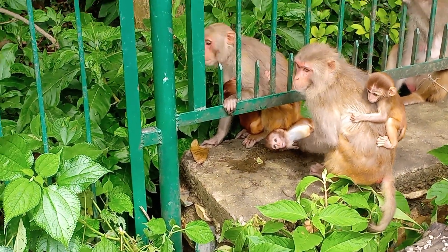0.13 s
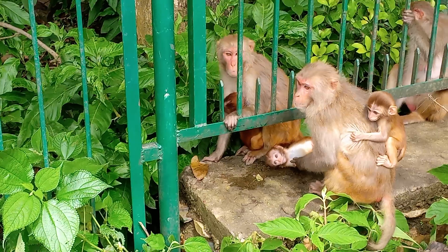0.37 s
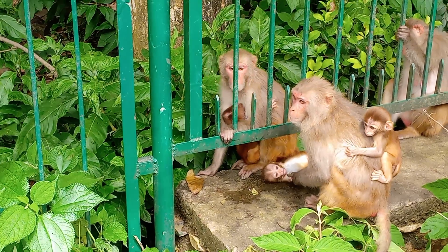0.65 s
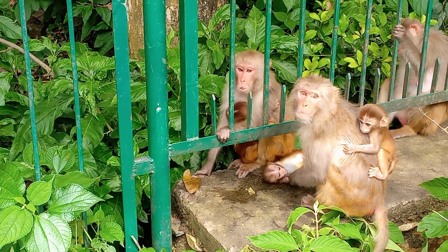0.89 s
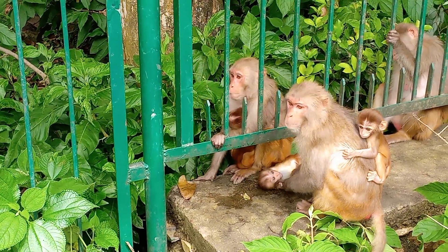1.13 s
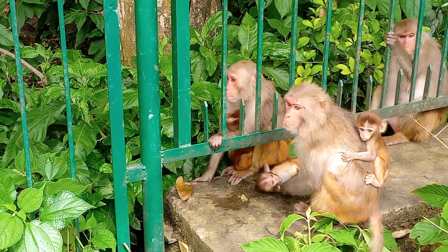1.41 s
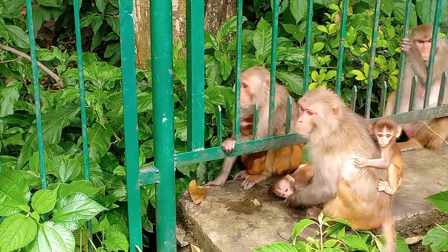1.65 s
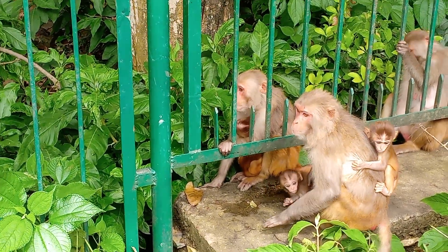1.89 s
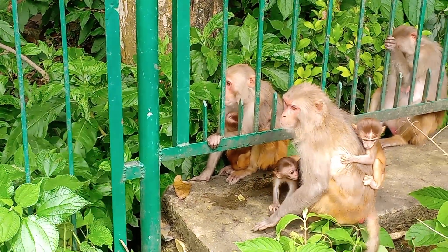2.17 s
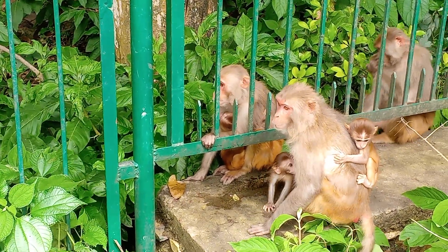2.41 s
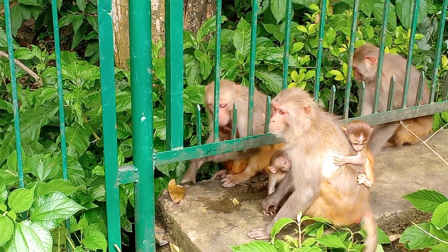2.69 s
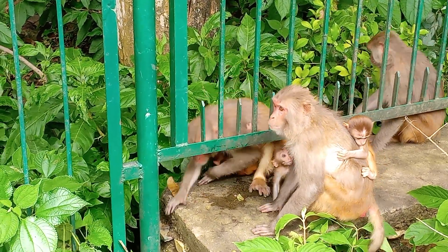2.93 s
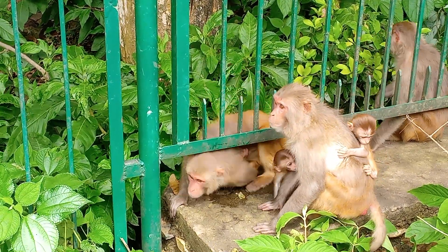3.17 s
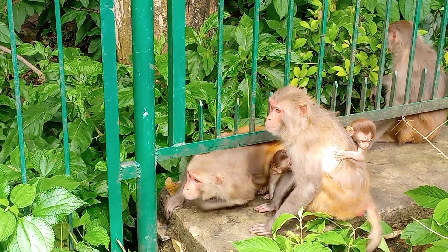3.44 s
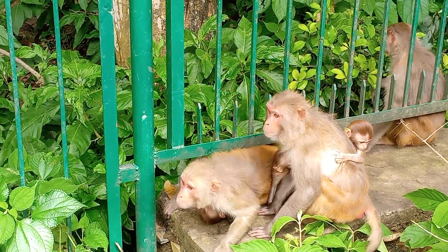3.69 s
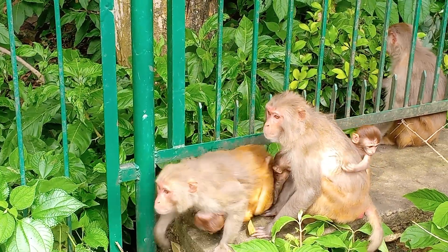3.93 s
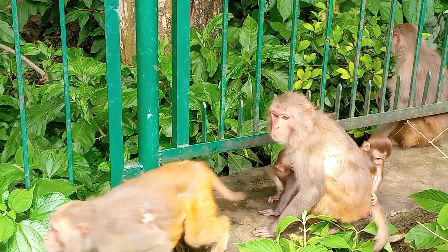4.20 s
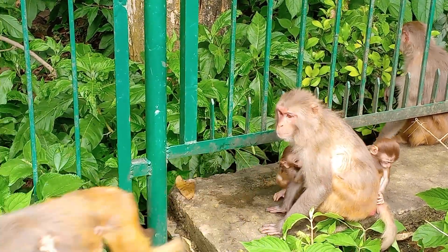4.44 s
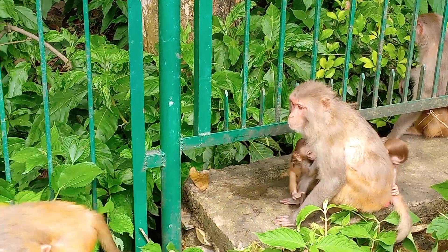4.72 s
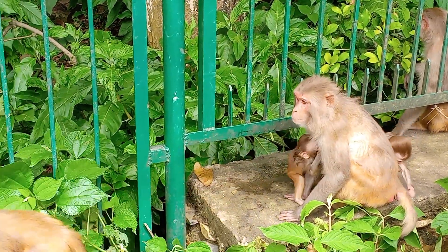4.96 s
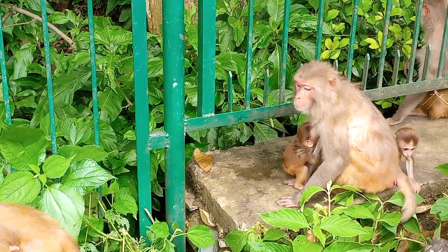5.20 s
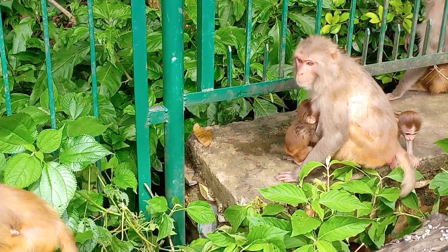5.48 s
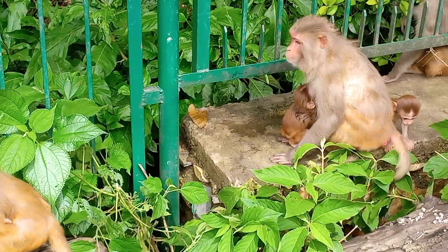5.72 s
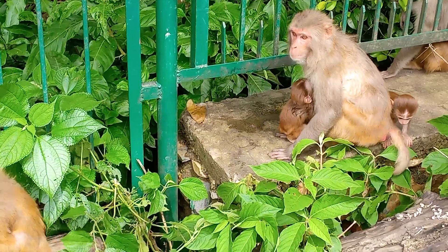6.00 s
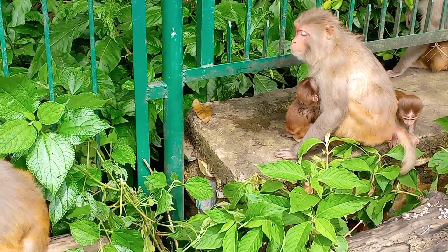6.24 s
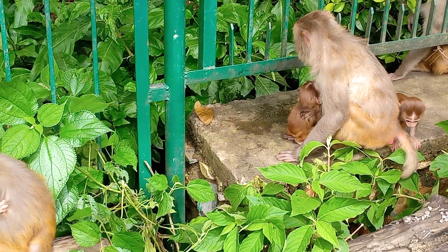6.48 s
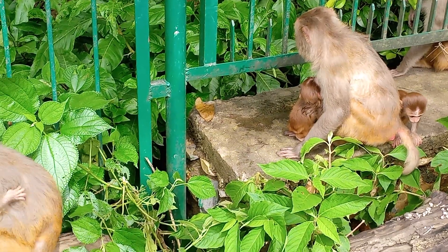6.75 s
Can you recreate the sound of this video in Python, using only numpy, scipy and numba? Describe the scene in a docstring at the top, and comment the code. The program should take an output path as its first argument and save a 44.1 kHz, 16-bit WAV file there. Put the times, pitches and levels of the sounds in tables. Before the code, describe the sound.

Outdoors among foliage, a young monkey is already screaming, harsh and raspy, at high pitch. After a short gap a squeal leaps up into another long, wavering scream, then a third shorter one. Small squeaks, pants and low grunts follow, with another brief shriek, leaf rustling and quick chatter. One last sharp squeal fades into a thin distant whistle. Close stereo pickup, much louder and brighter on the left, muffled on the right.

```python
"""A young monkey screams: chaotic vocal fold closures and chopped air ring in restless mouth resonances.
Squeals, faint coos and thin chirps are gliding partials; pants share the scream voice; grunts pulse in chest
and mouth. Leaves crackle as ringing clicks, chatter comes in short noise bursts, soft thumps are low sines.
A thin far whistle, wavering tones and open-air hush of filtered noise lie behind. The left microphone port
faces the troop; the right one hears it late and muffled."""
import sys
import numpy as np
from scipy import signal
from scipy.fft import rfft, irfft, next_fast_len
from scipy.io import wavfile
from scipy.ndimage import uniform_filter1d, minimum_filter1d
from numba import njit

SR = 44100
rng = np.random.default_rng(int(sys.argv[2]) if len(sys.argv) > 2 else 0)


def put_to_file(sound):
    """Save the sound as 16-bit audio at rate SR, in the file named by the first command-line argument."""
    columns = np.atleast_2d(sound).T  # one column per channel
    safe = np.clip(columns, -1, 1)
    whole_steps = np.round(safe * 32767)
    wavfile.write(sys.argv[1], SR, whole_steps.astype(np.int16))


def natural_amplitude(level_db):
    """Convert a level in decibels to a linear amplitude factor, elementwise."""
    exponent = np.asarray(level_db, float) / 20
    return 10 ** exponent


N = 302966   # length in samples


def rms_one(x):
    """Scale to an rms of 1."""
    return x / np.sqrt(np.mean(x ** 2) + 1e-20)


def smooth(x, seconds):
    """Moving average."""
    return uniform_filter1d(x, size=max(int(seconds * SR), 1))


def evened(x, seconds):
    """Divide by the running rms to level a sound out."""
    return x / np.sqrt(smooth(x ** 2, seconds) + 1e-12)


def drift(rate_hz):
    """Random wandering with an rms of 1: noise through two equal one-pole lowpasses."""
    pole = np.exp(-2 * np.pi * rate_hz / SR)
    noise = rng.standard_normal(N + SR)
    return rms_one(signal.lfilter([1], [1, -2 * pole, pole * pole], noise)[SR:])


def coloured(x, points, sign=1, lag_s=0):
    """Filter by a (Hz, dB) table, with an optional delay; sign -1 inverts the table."""
    size = next_fast_len(N + 4096)
    hz = np.arange(size // 2 + 1) * SR / size + 1e-3
    table = np.array(points, float)
    gain = natural_amplitude(sign * np.interp(np.log(hz), np.log(table[:, 0]), table[:, 1]))
    delay = np.exp(-2j * np.pi * hz * lag_s)
    return irfft(rfft(x, size) * gain * delay, size)[..., :N]


@njit
def resonate(x, hz, width, sr):
    """A two-pole resonance whose centre may move."""
    out, r = np.zeros(len(x)), np.exp(-np.pi * width / sr)
    for i in range(2, len(x)):
        ring = 2 * r * np.cos(2 * np.pi * hz[i] / sr) * out[i - 1] - r * r * out[i - 2]
        out[i] = x[i] - x[i - 2] + ring
    return out


def muffled(x):
    """Lowpass: the mouth radiates little above its top resonance."""
    return signal.sosfilt(signal.butter(6, 7200, fs=SR, output="sos"), x)


def pulses(rate_hz, jitter, spread_db):
    """One click per vocal fold cycle, uneven in time and size."""
    uneven_rate = rate_hz * (1 + jitter * drift(150)).clip(.1)
    cycle = np.floor(np.cumsum(uneven_rate) / SR)
    return np.diff(cycle, prepend=0) * natural_amplitude(spread_db * rng.standard_normal(N))


def played(calls, fade_s):
    """Columns of several calls over time, and a gate that is open during each call."""
    t, gate = np.arange(N) / SR, np.zeros(N)
    for rows in calls:
        gate[round(rows[0][0] * SR):round(rows[-1][0] * SR)] = 1
    s, *columns = np.transpose(np.concatenate(calls))
    return smooth(gate, fade_s), [smooth(np.interp(t, s, column), fade_s) for column in columns]


def air():
    """Open-air hush and gusty rumble: filtered noise, lumpy and different at each port."""
    # Colour of the hush. Each row: frequency in Hz, gain in dB.
    hush_colour = [(18, -45), (30, -3), (91, 5), (280, -4), (497, -5), (626, -6.5), (1370, -16),
                   (1720, -13.5), (2800, -17.5), (3140, -15), (5970, -21.5), (7350, -47), (9560, -60),
                   (16200, -120)]
    hush = rms_one(coloured(rng.standard_normal((2, N)), hush_colour))
    low_band = signal.butter(2, [45, 180], "band", fs=SR, output="sos")
    rumble = signal.sosfilt(low_band, rng.standard_normal((2, N)))
    gusts = natural_amplitude(-14 + 4 * drift(0.7) + 4.2 * drift(8))
    return natural_amplitude(-60.5) * (hush * natural_amplitude(2.9 * drift(3.2)) + gusts * rms_one(rumble))


def yard(x):
    """Scatter from trunks, leaves and walls: a dying noise for each port."""
    t60_s, onset_s = 0.5, 0.018
    t = np.arange(SR) / SR
    tail = rng.standard_normal((2, SR)) * natural_amplitude(-60 * t / t60_s) * (1 - np.exp(-t / onset_s))
    tail = signal.lfilter([1], [1, -.6], tail)   # foliage swallows the treble
    tail = tail / np.sqrt(np.sum(tail ** 2, axis=1, keepdims=True))
    return natural_amplitude(-25.5) * signal.fftconvolve(x[None], tail, axes=1)[:, :N]


def slab(x):
    """Close inverted echoes comb the voices into fixed streaks."""
    # Reflections from the ground slab and a wall. Each row: delay in seconds, gain in dB.
    reflections = [(.0047, -20.5), (.0093, -10.5)]
    out = x.copy()
    for delay_s, db in reflections:
        lag = round(delay_s * SR)
        out[lag:] -= natural_amplitude(db) * x[:-lag]
    return out


def whistles():
    """A thin far whistle of sines with a faint neighbour line, and far tones that come and go."""
    # Whistle notes. Each row: start in seconds, length in seconds, pitch in Hz, relative level in dB.
    notes = [(4.412, 0.17, 3290, -61), (5.833, 0.4, 3140, -52.5), (6.19, 0.35, 3072, -50.5),
             (6.547, 0.052, 3080, -60.5), (6.59, 0.11, 3060, -55.5), (6.695, 0.074, 3054, -53.5),
             (6.762, 0.12, 3050, -59.5)]
    # Wavering far tones. Each row: mean pitch in Hz, relative level in dB.
    far_tones = [(520, -79), (2100, -86.5)]
    out = np.zeros(N)
    for s, length, hz, db in notes:
        i = np.arange(round(s * SR), min(round((s + length) * SR), N))
        phase = 2 * np.pi * hz * i / SR
        shape = signal.windows.tukey(len(i), .4) * np.exp(-1.5 * (i / SR - s))
        neighbour = natural_amplitude(-17.0) * np.sin(1.139 * phase)
        out[i] += np.sqrt(2) * natural_amplitude(db) * shape * (np.sin(phase) + neighbour)
    out = out * natural_amplitude(2.5 * drift(25))
    for hz, db in far_tones:
        phase = 2 * np.pi * np.cumsum(hz + 10 * drift(6)) / SR
        out += natural_amplitude(db + 6 * drift(5.0)) * np.sin(phase)
    return out


def thumps():
    """Soft low thumps: each is a short, decaying low sine."""
    # Thumps. Each row: start in seconds, relative level in dB, pitch in Hz.
    low_thumps = [(1.395, -42, 75.4), (1.512, -33, 99.1), (4.466, -37.5, 203)]
    attack_s, decay_s = 0.00061, 0.014
    out, t = np.zeros(N), np.arange(4000) / SR
    for s, db, hz in low_thumps:
        at = round(s * SR)
        shape = np.exp(-t / decay_s) * (1 - np.exp(-t / attack_s))
        out[at:at + len(t)] += natural_amplitude(db) * shape * np.sin(2 * np.pi * hz * t)
    return out


def rustles():
    """Tiny uneven clicks and rubbing set leaves ringing, each in its own narrow band that comes and goes."""
    # Leaves and twigs under moving feet. Each row: start in seconds, length in seconds, relative level in dB.
    steps = [(1.485, 0.051, -48.5), (4.134, 0.12, -48), (4.385, 0.43, -51.5), (4.605, 0.18, -54.5),
             (4.802, 0.26, -57.5), (4.954, 0.029, -56), (5.092, 0.094, -60.5), (5.2, 0.14, -58)]
    # Colour of the leaves. Each row: frequency in Hz, gain in dB.
    leaf_colour = [(250, 0.5), (600, -6), (1200, -9.5), (2500, -4.5), (5000, -5.5), (7000, -13.5),
                   (8500, -33.5)]
    crackles_per_s = 500 * natural_amplitude(5 * drift(30))
    crackles = (rng.random(N) < crackles_per_s / SR) * rng.choice([-1, 1], N)
    sizes = natural_amplitude(2.2 * np.minimum(rng.exponential(1, N), 3))
    rubbing = 1.6 * rng.standard_normal(N)
    source = rms_one(crackles * sizes) + rubbing
    ringing = np.zeros(N)
    for hz in np.geomspace(500, 7400, 16) * rng.uniform(.95, 1.05, 16):
        leaf = rms_one(resonate(source, np.full(N, hz), 130.0, SR))
        ringing += leaf * np.sqrt(hz) * natural_amplitude(6 * drift(9))
    gain = np.zeros(N)
    for s, length, db in steps:
        i = np.arange(round(s * SR), round((s + length) * SR))
        gain[i] += natural_amplitude(db) * np.hanning(len(i))
    return gain * rms_one(coloured(rms_one(ringing) + .8 * rms_one(source), leaf_colour))


def chatter():
    """Short noisy bursts, each swelling and dying within milliseconds round its own pitch."""
    # Chatter bursts. Each row: time of the peak in seconds, relative level in dB, pitch in Hz.
    bursts = [(4.105, -42.5, 4200), (4.301, -37, 5250), (4.471, -36.5, 3080), (4.640, -33, 4670),
              (4.693, -35.5, 4600), (4.926, -48, 3170), (4.962, -45, 2530)]
    rise_s, fall_s, width_hz = 0.0063, 0.0083, 1200
    gain, pitch, t = np.zeros(N), np.full(N, 4000.0), np.arange(-1000, 1500) / SR
    for s, db, hz in bursts:
        i = np.round((s + t) * SR).astype(int)
        gain[i] += natural_amplitude(db - 10) * np.where(t < 0, np.exp(t / rise_s), np.exp(-t / fall_s))
        pitch[i] = hz
    ringing = resonate(rng.standard_normal(N), pitch, width_hz, SR)
    return muffled(gain * evened(ringing, 0.056))


def grunts():
    """Slow pulses with breath in chest and mouth resonances, swelling and fading as the pulse rate falls."""
    # Low grunts. Each row: start in seconds, length in seconds, nominal pulse rate in Hz,
    # relative chest level in dB, relative mouth level in dB.
    calls = [(0.839, .13, 169.4, -47.5, -63), (1.051, .11, 234.3, -44.5, -42),
             (1.738, .11, 214.9, -47.5, -63.5), (2.751, 0.06, 183.1, -48.5, -55),
             (2.786, .07, 167.1, -47.5, -79), (3.026, .095, 213.7, -50.5, -50.5),
             (3.761, .13, 219.5, -49, -49.5), (4.176, 0.061, 216.2, -44.5, -40),
             (4.221, 0.054, 215.5, -49.5, -47), (4.482, 0.08, 191.8, -50, -48),
             (4.532, 0.057, 230.6, -46, -50), (4.754, 0.079, 208.6, -49, -51.5)]
    rate_hz, chest_gain, mouth_gain = np.full(N, 200.0), np.zeros(N), np.zeros(N)
    for s, length, hz, chest_db, mouth_db in calls:
        i = np.arange(round(s * SR), round((s + length) * SR))
        rate_hz[i] = hz * np.linspace(1.05, .93, len(i))
        chest_gain[i] += natural_amplitude(chest_db) * np.hanning(len(i))
        mouth_gain[i] += natural_amplitude(mouth_db) * np.hanning(len(i)) ** 2
    breath = 0.88 * rng.standard_normal(N)
    beats = rms_one(pulses(rate_hz, jitter=0.053, spread_db=4.0)) + breath

    first = resonate(beats, rate_hz, 170.0, SR)
    second = resonate(beats, 2 * rate_hz, 58.0, SR)
    chest = resonate(first + 0.11 * second, 0.75 * rate_hz, 270.0, SR)

    mouth = resonate(resonate(beats, np.full(N, 860.0), 350.0, SR), np.full(N, 930.0), 360.0, SR)
    third = resonate(beats, 3 * rate_hz, 130.0, SR)
    upper = resonate(beats, np.full(N, 1750.0), 790.0, SR)
    mouth = rms_one(mouth) + .5 * rms_one(third) - 0.034 * rms_one(upper)
    return chest_gain * evened(chest, 0.13) + mouth_gain * evened(mouth, 0.45)


def glide_rows(s, length, from_hz, to_hz, db):
    """A coo or chirp as three squeal rows: a two-part glide whose level rises toward the end."""
    middle_hz = from_hz + .55 * (to_hz - from_hz)
    return [(s, from_hz, db - 0.5), (s + .45 * length, middle_hz, db), (s + length, to_hz, db + 4)]


def squeals():
    """Regular fold cycles: up to four partials with a tremble, tearing when loud, breaking up as they fall."""
    # Clear squeals. Each row: overtone level relative to the fundamental in dB for a 2 kHz pitch, then the
    # points of its glide (time in seconds, pitch in Hz, relative level in dB).
    clear_calls = [ (-25, [(.74, 914.4, -89), (.82, 1082, -72.5), (.884, 1082, -53), (1.16, 1189, -65.5)]),
                   (0.5, [(.876, 1747, -51), (.886, 2002, -42), (.89, 2237, -26), (.908, 3120, -24.5),
                   (.935, 3250, -36)]), (-26.5, [(.915, 4300, -28), (.957, 6690, -36), (.975, 6940, -28)]),
                   (-17, [(1.32, 1793, -41), (1.36, 1570, -43.5), (1.42, 1451, -51.5), (1.49, 1383, -49),
                   (1.505, 991.5, -44.5), (1.525, 943, -58)]), (-12, [(1.54, 1233, -61.5), (1.6, 1550, -62),
                   (1.69, 1795, -54), (1.73, 1825, -50), (1.75, 2080, -57), (1.775, 2920, -62.5)]),
                   (8.5, [(2.03, 1709, -73), (2.048, 2060, -71.5), (2.065, 3796, -42),
                   (2.085, 3794, -52.5)]), (-24.5, [(2.084, 6660, -46.5), (2.098, 6550, -37),
                   (2.118, 4860, -46.5)]), (-24.5, [(2.098, 4283, -42.5), (2.108, 4127, -35.5),
                   (2.14, 3900, -58)]), (3, [(2.146, 925, -51.5), (2.156, 1696, -46), (2.163, 2256, -30),
                   (2.172, 2616, -22.5)]), (-15, [(2.35, 1577, -48.5), (2.39, 1099, -52.5),
                   (2.43, 849, -59)]), (10.5, [(2.52, 1652, -71.5), (2.55, 2138, -66), (2.575, 1884, -66)]),
                   (-15, [(2.73, 907, -71), (2.816, 1372, -62.5), (2.9, 1150, -71.5), (2.954, 1611, -57),
                   (3.0, 1404, -63.5), (3.032, 2033, -54.5), (3.07, 2380, -68.5)]),
                   (-1, [(3.32, 1930, -84.5), (3.34, 2460, -59), (3.356, 3160, -76)]),
                   (-11.5, [(3.357, 3500, -46), (3.37, 3910, -50.5), (3.4, 5413, -47), (3.455, 5680, -40),
                   (3.463, 4670, -46), (3.472, 4140, -36), (3.48, 3480, -67)]), (-10, [(3.487, 2900, -61),
                   (3.497, 1987, -64.5), (3.515, 1635, -64.5), (3.543, 2010, -67.5), (3.56, 2600, -57)]),
                   (-20, [(3.54, 3950, -70.5), (3.555, 4100, -53), (3.57, 3750, -55), (3.59, 4415, -35.5)]),
                   (16, [(3.597, 1720, -69.5), (3.625, 2125, -56.5), (3.655, 2249, -43.5),
                   (3.7, 2280, -55)]), (-18, [(3.71, 2248, -38), (3.736, 1528, -46), (3.76, 1316, -57)]),
                   (-8, [(4.018, 3760, -52), (4.045, 3833, -50), (4.075, 4060, -55.5), (4.105, 4135, -45),
                   (4.135, 3650, -58)]), (-11.5, [(5.06, 1037, -63.5), (5.166, 1290, -62),
                   (5.22, 2066, -69), (5.26, 1734, -70), (5.31, 2074, -77), (5.335, 2566, -56.5),
                   (5.4, 1819, -79)]), (-12, [(5.72, 1058, -71), (5.8, 1278, -61.5), (5.83, 1560, -63),
                   (5.87, 1660, -70)]), (8, [(5.9, 1868, -74), (5.92, 2080, -57.5), (5.952, 2256, -43.5),
                   (5.995, 2154, -47.5)]), (1, [(6.005, 2515, -23.5), (6.02, 1937, -47),
                   (6.06, 1104, -60)]), ]
    # Far coos and thin high chirps. Each row: start in seconds, length in seconds,
    # first pitch in Hz, last pitch in Hz, relative level in dB.
    coos_and_chirps = [(4.255, 0.05, 6700, 6800, -46), (4.57, 0.072, 6300, 6900, -46.5),
                       (1.84, 0.14, 2000, 1777, -78.5), (3.432, 0.25, 1090, 1270, -68.5),
                       (4.03, 0.124, 660, 880, -71), (4.09, 0.053, 1140, 1105, -69.5),
                       (2.8, 0.043, 1950, 620, -65), (3.6, 0.079, 970, 780, -59),
                       (5.72, 0.11, 1076, 1058, -62.5), (5.86, 0.2, 1314, 1010, -67.5),
                       (6.44, 0.12, 1150, 1200, -71.5), (6.05, 0.18, 570, 510, -66.5)]
    # Partials light up as they pass the open mouth's resonance. Each row: frequency in Hz, gain in dB.
    open_mouth = [(2600, 2), (3400, 0.5), (4200, 4), (5000, 1.5), (6000, 3.5), (7200, -6), (8200, -11.5)]
    torn_from_db, torn_span_db = -64, 26   # clean below the first, fully torn this much above it
    clean_glide_per_s = 4   # notes rising faster than this (log pitch per second) stay clean
    out, tremble, flutter = np.zeros(N), drift(140), drift(97)
    tearing, faltering, wavering = drift(350), drift(18), [drift(30) for _ in range(3)]
    for over_db, rows in clear_calls + [(-30, glide_rows(*call)) for call in coos_and_chirps]:
        s, hz, db = np.transpose(rows)
        i = np.arange(round(s[0] * SR), min(round(s[-1] * SR), N))
        hz = smooth(np.interp(i / SR, s, hz), (s[-1] - s[0]) / 20)
        db = np.interp(i / SR, s, db)

        glide = np.gradient(np.log(hz)) * SR
        torn = ((db - torn_from_db) / torn_span_db).clip(0, 1) * (glide < clean_glide_per_s)
        breaking = .07 * torn * (glide < -clean_glide_per_s) * (hz < 2600)
        scatter = 18 / hz + .012 * torn + breaking
        phase = 2 * np.pi * np.cumsum(hz * (1 + scatter * tremble[i])) / SR

        edges = np.minimum(np.minimum(i - i[0], i[-1] - i) / (.005 * SR), 1)   # 5 ms fades
        fade = edges * np.sqrt(2) * natural_amplitude(2.5 * flutter[i] + 2.2 * faltering[i])
        overtones = np.zeros(len(i))
        for k, size in enumerate([.9, .5, .2]):
            in_range = (k + 2) * hz < SR / 3
            overtones += size * natural_amplitude(4 * wavering[k][i]) * in_range * np.sin((k + 2) * phase)
        rich = natural_amplitude(over_db - 8.5 * np.log2(hz / 2000))   # high notes are purer
        # a second, slower fold vibration at .18 of the pitch puts side lines on loud squeals
        rough = 1 + torn * (.45 * tearing[i] + .55 * np.sin(.18 * phase))
        out[i] += fade * natural_amplitude(db) * rough * (np.sin(phase) + rich * overtones)
    return muffled(coloured(out, open_mouth))


def pant_rows(s, length, db, hz, bright_db):
    """A pant as four scream rows: a quick swell, a sagging hold, a release."""
    attack_s, release_s, edge_db, sag_db_per_s = .02, 0.076, -12, -11
    top, held = min(attack_s, .5 * length), max(length - release_s, .5 * length)
    held_db = db + sag_db_per_s * (held - top)
    shape = [(0, db + edge_db), (top, db), (held, held_db), (length, held_db + edge_db)]
    return [(s + after, level_db, hz, bright_db) for after, level_db in shape]


def screams():
    """Chaotic fold closures and the air they chop, ringing in narrow, restless mouth resonances."""
    # Harsh screams, one list of points each. Each row: time in seconds, relative level in dB,
    # first mouth resonance in Hz, brightness in dB.
    harsh_calls = [
        [(0.0, -20, 3263, -3), (0.03, -19.5, 3615, -1), (0.176, -21, 3490, -7), (0.264, -26, 3375, 0),
         (0.31, -35, 3525, -0.5), (0.34, -25, 3060, -7.5), (0.35, -26, 2766, -21.5), (0.4, -58, 2814, -9)],
        [(0.9, -49.5, 3207, 1.5), (0.93, -25.5, 3170, -1.5), (0.978, -34.5, 3510, 1), (1.014, -22, 3407, 0),
         (1.064, -18, 3196, -8), (1.094, -25, 2676, -15), (1.116, -27.5, 2470, -3.5),
         (1.178, -25.5, 3640, -0.5), (1.224, -27.5, 3595, -1.5), (1.282, -17, 3510, -1),
         (1.346, -23, 3080, -8.5), (1.41, -30, 2545, -16), (1.486, -31.5, 2575, -9.5), (1.53, -48.5, 2570, -22)],
        [(2.165, -30.5, 2878, 0.5), (2.193, -18.5, 2950, -4.5), (2.243, -25, 3417, -0.5),
         (2.293, -18.5, 3726, -3.5), (2.351, -21, 2946, -7), (2.405, -39.5, 2630, -9),
         (2.46, -53.5, 2760, -6.5)],
        [(3.597, -50, 3810, 6), (3.624, -28, 3210, -1), (3.668, -27, 3606, 0), (3.712, -20, 3357, -3.5),
         (3.77, -44.5, 2847, -7)],
        [(5.91, -64, 2943, 5), (5.922, -41.5, 2793, 1), (5.962, -31, 3706, 0), (6.012, -27, 3130, -2),
         (6.034, -36.5, 2775, -27), (6.05, -40, 2760, -23)],
    ]
    # Soft pants and rasps. Each row: start in seconds, length in seconds, relative level in dB,
    # first mouth resonance in Hz, brightness in dB.
    soft_calls = [(0.836, 0.035, -57.5, 3460, -8), (1.742, 0.11, -43.5, 2494, -1),
                  (2.089, 0.049, -37, 3680, -0.5), (2.545, 0.052, -50.5, 3720, -3.5),
                  (2.754, 0.0393, -54, 3420, -2.5), (2.798, 0.067, -50.5, 3680, -4.5),
                  (3.019, 0.079, -52.5, 3210, -0.5), (3.23, 0.013, -65.5, 3260, -12),
                  (3.39, 0.21, -55.5, 4410, -1), (3.779, .12, -47, 3030, -2),
                  (3.962, 0.022, -53.5, 3260, -23), (4.036, 0.055, -55.5, 3400, 1),
                  (4.072, 0.06, -47, 4600, -22.5), (4.155, 0.14, -48.5, 3720, -0.5),
                  (4.267, 0.0535, -61.5, 2820, 5.5), (4.461, 0.18, -53.5, 3190, -0.5),
                  (4.598, 0.057, -40.5, 3150, 1), (4.687, 0.023, -43, 2570, -1.5),
                  (4.74, 0.11, -49.5, 3250, -0.5), (4.9, 0.064, -66, 2980, -6),
                  (4.943, 0.027, -37, 2580, -13), (5.072, 0.139, -60, 3230, -1),
                  (5.178, 0.115, -65, 3300, -2)]
    # How the folds close. Each row: time in seconds, mean closures per second, share of regular rattle (0-1).
    fold_rattle = [(0, 480, .5), (.25, 510, .55), (.35, 450, .3), (.92, 365, .25), (1.03, 260, .28),
                   (1.3, 320, .3), (1.5, 290, .25), (2.18, 415, .35), (2.23, 370, .5), (2.4, 360, .4),
                   (3.655, 560, .1), (3.675, 575, .8), (3.697, 560, .8), (3.715, 470, .4), (4.15, 215, .4),
                   (5.3, 200, .4), (5.93, 435, .2), (6.0, 480, .55)]
    # Broad colour of the rasp. Each row: frequency in Hz, gain in dB.
    throat_colour = [(500, -74), (900, -35), (1370, -17), (1800, -25), (2500, -3.5), (3300, 8.5),
                     (4860, -2), (6160, -3), (7350, -48), (9500, -58), (15000, -81.5)]
    # Colour of the treble above 7 kHz, thin near 12.7 kHz. Each row: frequency in Hz, gain in dB.
    treble_colour = [(6500, -25), (7700, 0), (10500, -15), (12700, -44), (15000, -21)]
    calls = [list(rows) for rows in harsh_calls] + [pant_rows(*pant) for pant in soft_calls]
    calls = sorted(calls, key=lambda rows: rows[0][0])
    gate, (level_db, low_hz, bright_db) = played(calls, .008)
    # the second resonance sinks as the first rises; brightness lifts it and the top one
    mid_hz = 4746 - 0.86 * (low_hz - 3200)
    mid_db, top_db = 0.2 + 3.9 * bright_db, -5.5 + 3.7 * bright_db

    s, rate, share = np.transpose(fold_rattle)
    rate, share = (np.interp(np.arange(N) / SR, s, column) for column in (rate, share))
    closures = pulses(rate, jitter=.13 * (1 - share) ** 2, spread_db=1.2)
    puffs = rms_one(signal.lfilter([1], [1, -.97], closures))
    chopped = rng.standard_normal(N) * (.9 + puffs)
    closures = rms_one(closures)
    source = np.sqrt(1 - share) * rms_one(chopped) + np.sqrt(share) * closures

    def band(hz, width, source=source):
        """One resonance in two passes; its centre wanders and its strength tears."""
        hz = hz * (1 + 0.022 * drift(25))
        ringing = resonate(resonate(source, hz, width, SR), hz, 2 * width, SR)
        return evened(ringing, 0.067) * natural_amplitude(2.6 * drift(24))

    low_share = np.sqrt((1 - natural_amplitude(2 * mid_db) - natural_amplitude(2 * top_db)).clip(.02))
    ringing = (band(low_hz, 200.0) + band(1.13 * low_hz, 500.0)) / np.sqrt(2)
    rattling = band(1.12 * low_hz, 650.0, closures)
    low = low_share * (np.sqrt(1 - share) * ringing + np.sqrt(share) * rattling)
    mid = natural_amplitude(mid_db) * band(mid_hz, 380.0)
    top = natural_amplitude(top_db) * (band(low_hz + 2500, 750.0) + 0.9 * band(np.full(N, 6400.0), 530.0))
    # a closing mouth lets out a band at half its first resonance
    half = natural_amplitude(-36.0 - 27.0 * (low_hz / 1000 - 3.0)) * band(low_hz / 2, 280.0)
    # soft calls are chestier
    panting = natural_amplitude(-34.5 - 0.4 * (level_db + 24.0)) * band(np.full(N, 1600.0), 2200.0)

    # the rasp tears into streaks that follow the mouth
    shreds = np.zeros(N)
    for ratio in np.geomspace(.9, 2.3, 9):
        shreds += band(ratio * low_hz, 170.0) * np.sqrt(ratio) * natural_amplitude(5 * drift(14))
    rasp = natural_amplitude(-1.5) * rms_one(coloured(rms_one(shreds) + 1.6 * source, throat_colour))

    # patchy treble, stronger in loud calls
    treble_gain = natural_amplitude(top_db / 2 + 0.22 * level_db - 13.5 + 1.7 * drift(16))
    treble = rms_one(coloured(source, treble_colour)) * treble_gain
    voice = muffled(low - mid + top - half + panting)
    return gate * natural_amplitude(level_db) * (voice + rasp + smooth(gate, 0.059) ** 2 * treble)


def scene():
    """Mix the troop, its scatter and the background at the two microphone ports."""
    # How much louder the left port is than the right. Each row: frequency in Hz, difference in dB.
    port_shadow = [(60, 3.5), (170, 11.5), (290, 10), (490, 13), (840, 18), (1420, 19.5), (2400, 32),
                   (4070, 26), (7500, 62.5), (12000, 33.5)]
    squealing = squeals()
    troop = natural_amplitude(5.5) * slab(screams() + squealing + grunts() + thumps() + rustles() + chatter())
    scatter = yard(troop + natural_amplitude(4.0) * squealing)   # the squealers stand deeper among the trunks
    hush = air()
    near = troop + scatter[0] + natural_amplitude(2.5) * whistles()
    shaded = coloured(near, port_shadow, sign=-1, lag_s=.00045)
    beside = natural_amplitude(1.0) * scatter[1] + natural_amplitude(4.5) * hush[1]
    own = coloured(beside, port_shadow, sign=-1)
    return np.array([near + hush[0], shaded + own])


def low_pass(x):
    """Removes everything above the highest recorded frequency."""
    return signal.sosfilt(signal.butter(12, 15800, fs=SR, output="sos"), x)


def record(dry):
    """A look-ahead limiter holds the loudest peaks, then the microphone drops the deep bass."""
    peak = np.abs(dry).max(axis=0) + 1e-9
    room = minimum_filter1d(np.minimum(.97 / peak, 1), size=441)
    bass_cut = signal.butter(4, 52, "high", fs=SR, output="sos")
    held = signal.sosfilt(bass_cut, dry * smooth(room, .01))
    return low_pass(held)


dry = scene()
out = record(dry)
put_to_file(out)
```